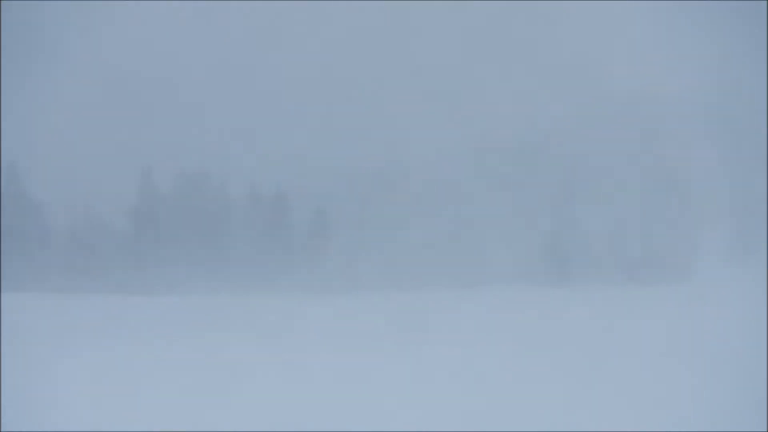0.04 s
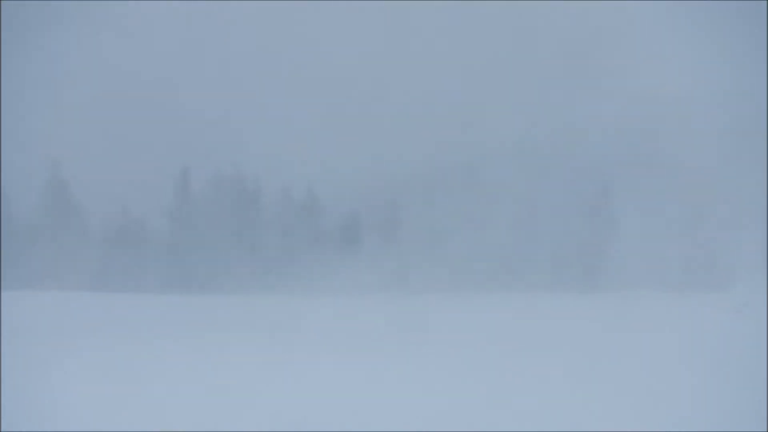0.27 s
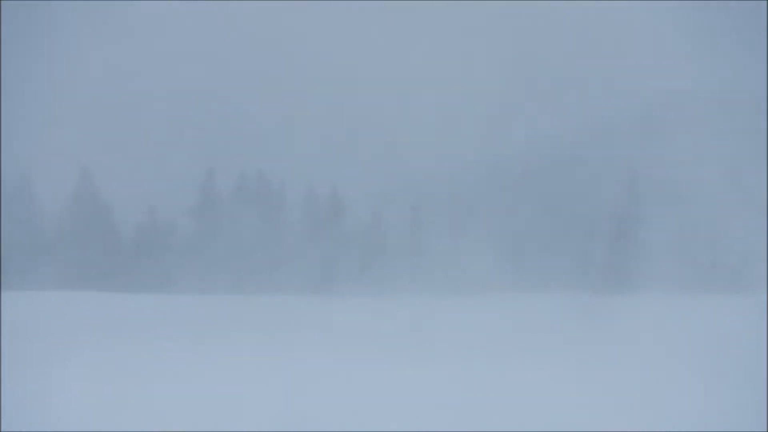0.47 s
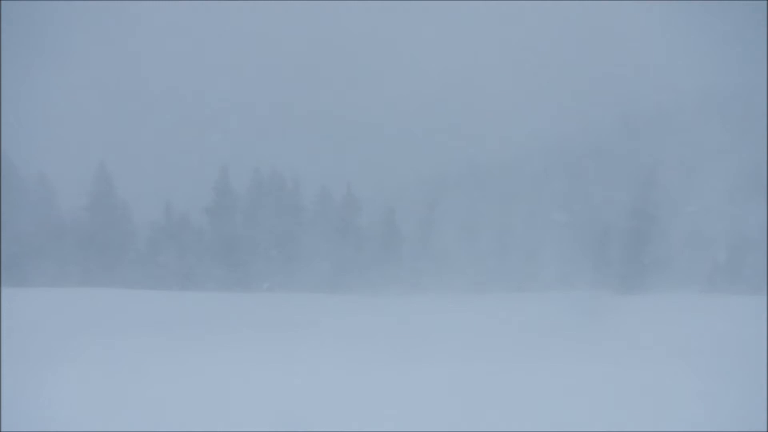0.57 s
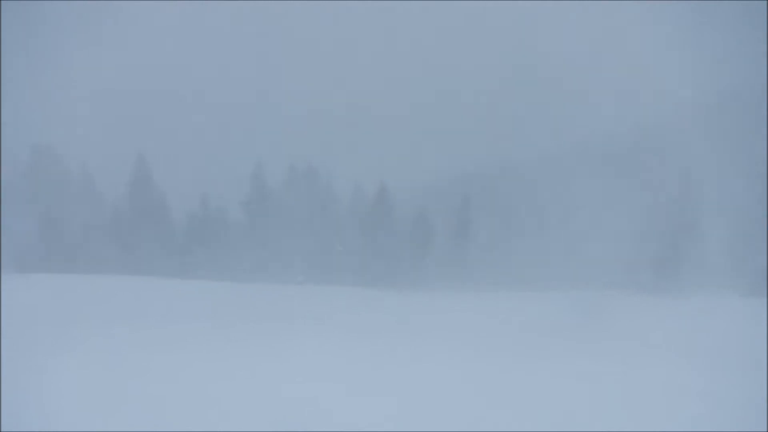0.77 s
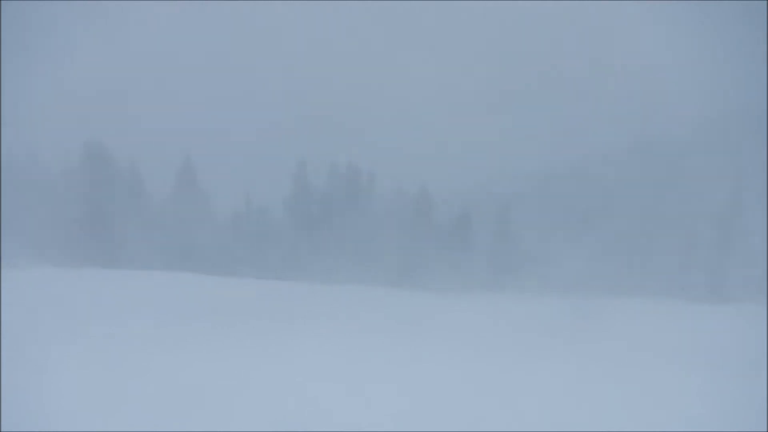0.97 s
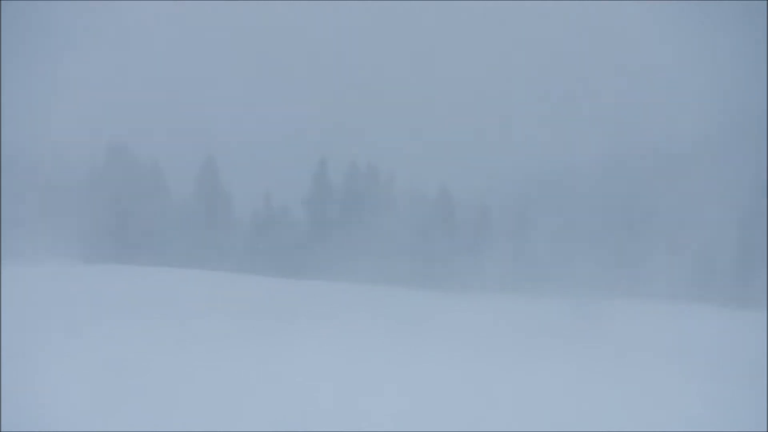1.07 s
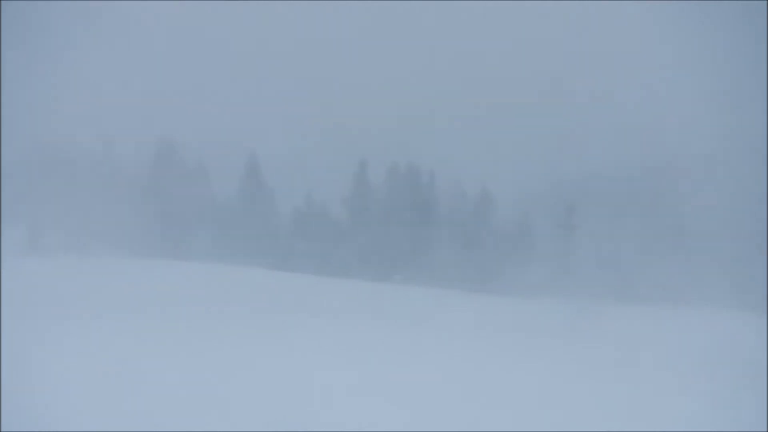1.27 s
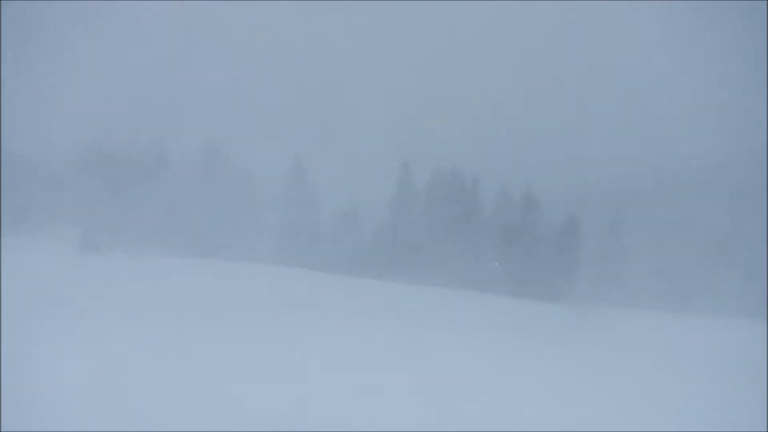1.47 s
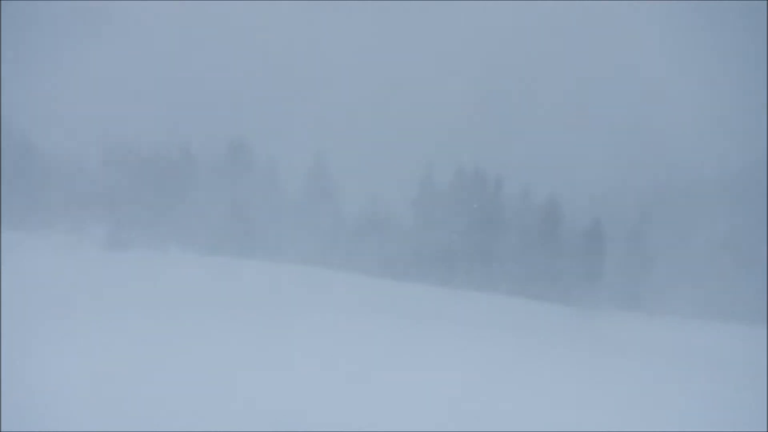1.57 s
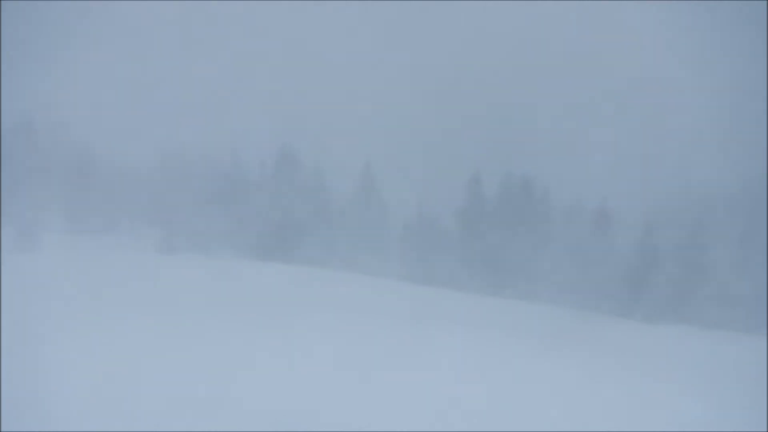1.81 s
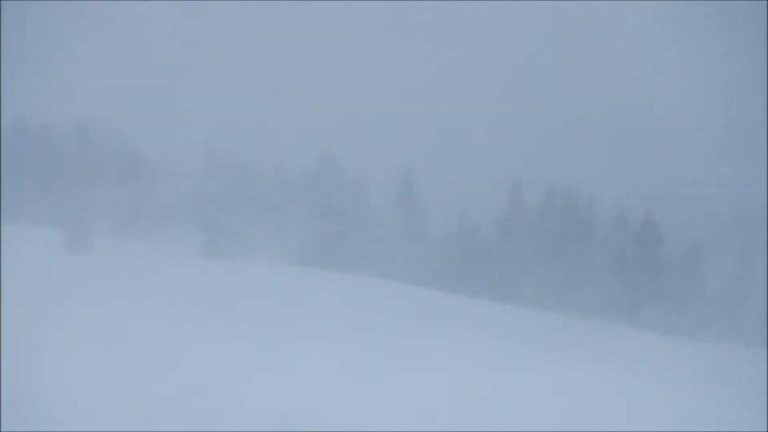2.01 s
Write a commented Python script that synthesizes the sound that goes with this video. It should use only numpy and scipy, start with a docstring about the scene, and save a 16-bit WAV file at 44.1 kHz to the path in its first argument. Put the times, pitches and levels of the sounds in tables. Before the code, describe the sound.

Heavy low wind rumble thumps the microphone in uneven lumps, ice grains ticking, then eases off

```python
"""Wind over an open snowfield, heard through the two ports (left and right) of a camera's microphone.
From the start a storm rushes in the firs (shaped noise), and a gust soon swells in (lumpy low noise).
Early in the gust, snow sifts (random clicks), brushes (noise swishes) and ticks (short rings) on the housing.
Next the gust slaps the ports hardest (single pressure swings), while the rush is heard more faintly for a bit.
The gust eases into small puffs, and at the end a little more snow fizzes, brushes and ticks."""
import sys
import numpy as np
from scipy.fft import rfft, irfft, next_fast_len
from scipy.io import wavfile
from scipy.ndimage import map_coordinates

SR = 44100
rng = np.random.default_rng(int(sys.argv[2]) if len(sys.argv) > 2 else 0)


def wav_out(sig):
    """Save sig, one row per channel (or a flat mono array), as 16-bit PCM at SR to the path in sys.argv[1]."""
    wavfile.write(sys.argv[1], SR, np.round(np.clip(np.atleast_2d(sig).T, -1, 1) * 32767).astype(np.int16))


N = 90404  # length in samples, about 2 s


def amp(db):
    """Turn decibels into a gain."""
    return 10 ** (np.asarray(db) / 20)


def unit(x):
    """Scale a sound to an average (rms) strength of 1."""
    return x / np.sqrt(np.mean(x ** 2) + 1e-20)


def along(points, hz):
    """Read a value at each frequency from (Hz, value) points, on a log frequency axis."""
    f, v = np.transpose(points)
    return np.interp(np.log(hz + 1), np.log(f + 1), v)


def curve(rows):
    """Join (time, value) rows with straight lines, one value per sample."""
    return np.interp(np.arange(N) / SR, *np.transpose(rows))


def lean(db):
    """Left and right gains that differ by the given decibels; positive is louder on the left."""
    half = np.atleast_1d(db) / 2
    return amp(np.array([half, -half]))


def wobble(rate):
    """A smooth random curve through `rate` random points a second."""
    return map_coordinates(rng.standard_normal(1024), [np.arange(N) * rate / SR], mode="wrap")


def filtered(x, response):
    """Multiply the spectrum of x by a response that depends on frequency."""
    m = next_fast_len(N + SR // 2)  # spare room at the end for ringing
    hz = np.fft.rfftfreq(m, 1 / SR)
    return irfft(rfft(x, m) * response(hz), m)[..., :N]


def coloured(x, spectrum):
    """Shape x with a tone curve, then scale it to rms 1."""
    return unit(filtered(x, lambda hz: amp(along(spectrum, hz))))


# level at which the rush reaches the ear, with a brief dip around 0.5 to 0.7 s, before its overall lift:
# (time [s], level [dB])
RUSH_HEARD = [(0, -46.5), (.15, -49), (.22, -50.5), (.33, -48), (.41, -50), (.49, -54), (.55, -52),
              (.6, -52), (.68, -50.5), (.9, -45.5), (1.22, -45), (1.35, -43.5), (1.6, -44), (1.9, -44),
              (2.05, -43.5)]
# tone of the rush: (frequency [Hz], relative level per Hz [dB])
FIRS_TONE = [(40, -45), (150, 2), (400, 2), (800, 1), (1400, 1.5), (2000, -0.5), (2900, -4), (3600, -8.5),
             (5000, -11), (7500, -15.5), (9500, -15.5), (12000, -13), (14500, -20.5), (16000, -28)]
# how alike left and right are, 1 or more meaning identical: (frequency [Hz], likeness [0 to 1])
FIRS_LIKENESS = [(60, 3), (290, 1), (1400, 0.78), (3000, 0.88), (4500, 0.62), (7500, 0.33), (10000, 0.39),
                 (15000, 0.3)]
# which side is louder: (frequency [Hz], left minus right [dB])
FIRS_BALANCE = [(100, 3), (600, -2.5), (2300, 0.5), (4500, 3.5), (8000, 0), (15000, -2.5)]
RUSH_LIFT_DB, FIRS_LEAD_S = 4, .00006  # overall lift; how much earlier the left port hears it


def firs():
    """The far rush is noise, near mono in the middle and wide in the treble; it reaches the left port first."""
    def blend(hz):
        """Shares of common and opposite noise that give the wanted likeness."""
        turn = np.arccos(np.clip(along(FIRS_LIKENESS, hz), -1, 1)) / 2
        return np.array([np.cos(turn), np.sin(turn)])

    def ports(hz):
        """Side balance, plus a phase turn that makes the left port early and the right one late."""
        early_late = np.exp(np.outer([1, -1], 1j * np.pi * hz * FIRS_LEAD_S))
        return lean(along(FIRS_BALANCE, hz)) * early_late

    mid, side = filtered(rng.standard_normal((2, N)), blend)
    pair = filtered(np.array([mid + side, mid - side]), ports)
    level = curve(RUSH_HEARD) + RUSH_LIFT_DB + 0.7 * wobble(13.56)
    return amp(level) * coloured(pair, FIRS_TONE)


# how loud the blown snow sifts over the housing: (time [s], level [dB])
DRIFT_LEVEL = [(0, -65), (.1, -57), (.155, -45), (.215, -57), (.255, -40.5), (.32, -45), (.395, -54),
               (.42, -46), (.455, -42), (.49, -53), (.55, -45), (.6, -65), (.73, -46.5), (.8, -56.5),
               (1.8, -56), (1.95, -48), (1.99, -41.5), (2.05, -46)]
# tone of the sifting: (frequency [Hz], relative level per Hz [dB])
SIFT_TONE = [(500, -36), (2000, -5), (4000, -4.5), (7500, -4.5), (10000, -1), (12000, 4), (14500, -1.5),
             (16000, 1)]
GRAINS_PER_S, GRAIN_SPREAD_DB = 1100, 13  # grains a second at each port; most a grain is raised


def spindrift():
    """Dense tiny snow grains of uneven size, each a single click, make a bright fizz."""
    hits = rng.random((2, N)) < GRAINS_PER_S / SR
    sizes = amp(GRAIN_SPREAD_DB * rng.uniform(-0.54, 1, (2, N)))
    push_or_pull = rng.choice([-1, 1], (2, N))
    return amp(curve(DRIFT_LEVEL)) * coloured(hits * sizes * push_or_pull, SIFT_TONE)


# clumps of snow brushing the housing: (time [s], level [dB], half length [s])
SNOW_CLUMPS = [(0.258, -42.5, 0.0088), (0.444, -34.5, 0.0029), (1.991, -34, 0.0058)]
# tone of the brushing: (frequency [Hz], relative level per Hz [dB])
SCUFF_TONE = [(150, -11), (500, 3), (1000, 7), (2000, 0.5), (4000, -6), (8000, -15.5), (15000, -10)]


def scuffs():
    """Soft clumps of snow make short, duller swishes: noise that swells and fades in a bell shape."""
    t = np.arange(N) / SR
    level = sum(amp(db) * np.exp(-.5 * ((t - s) / half) ** 2) for s, db, half in SNOW_CLUMPS)
    return level * coloured(rng.standard_normal((2, N)), SCUFF_TONE)


# ice grains hitting the housing:
# (time [s], level [dB], left minus right [dB], dull knock relative to that level [dB])
ICE_HITS = [(0.204, -28.5, 5, -19), (.258, -25, -4, -18), (0.263, -19, -12, 3), (0.3428, -25, 3, -10),
            (.376, -27.5, 7, -6), (0.4174, -34, 12, 13.5), (0.4441, -13, -4, -3.5), (0.447, -18.5, 4, -20),
            (.460, -31.5, 22, 4.5), (.5628, -28.5, -6, -6), (.617, -27.5, -1, -16), (0.6233, -31, -5, 15),
            (1.8453, -19.5, -6.5, 1.5), (1.980, -29, 5, -12), (1.987, -33, 3, 9)]
# tones the housing rings with: (centre frequency [Hz], level within a tick [dB], time to fade by 60 dB [s])
HOUSING_TONES = [(6600, -20, 0.0041), (10900, -4.5, 0.0019), (12150, -3.5, 0.0017), (13900, -20, 0.0026)]
KNOCK_HZ, KNOCK_T60_S, KNOCK_RISE_S = 880, 0.0012, .00004  # pitch, time to fade by 60 dB, softened start


def ice_ticks():
    """Each larger grain rings the housing for a few milliseconds, over a dull knock."""
    out = np.zeros((2, N + SR))
    t = np.arange(SR // 50) / SR
    knock = amp(-60 * t / KNOCK_T60_S) * np.cos(2 * np.pi * KNOCK_HZ * t)
    knock = knock * -np.expm1(-t / KNOCK_RISE_S)
    for s, db, pan_db, knock_db in ICE_HITS:
        bright = np.zeros((2, len(t)))
        for port in range(2):
            for hz, level, t60 in HOUSING_TONES:
                pitch = hz * (1 + 0.022 * rng.standard_normal())  # a little different each time
                bright[port] += amp(level - 60 * t / t60) * np.sin(2 * np.pi * pitch * t)
        start = round(s * SR)
        out[:, start:start + len(t)] += amp(db) * lean(pan_db) * (bright + amp(knock_db) * knock)
    return out[:, :N]


# single eddies that slap a port, before tone shaping:
# (time [s], level [dB], pitch [Hz], port struck ["L" or "R"])
EDDY_SLAPS = [(0.151, -15, 100, "L"), (.232, -7, 194, "L"), (.341, -4, 254, "R"), (0.345, -6, 238, "L"),
              (.368, -6.5, 240, "R"), (.383, -14, 486, "R"), (0.406, -4, 278, "R"), (.410, -8.5, 400, "R"),
              (.417, -3, 500, "L"), (.522, -8.5, 164, "R"), (.527, -3.5, 423, "R"), (.539, -16, 477, "R"),
              (.555, -19, 604, "R"), (.5675, -12, 420, "L"), (0.612, -6.5, 166, "R"), (.667, 4, 193, "L"),
              (.679, -7, 313, "L"), (0.71, 2, 120, "R"), (0.716, 1.5, 160, "L"), (.726, 2.5, 350, "R"),
              (.731, -2, 510, "R"), (.745, -4.5, 400, "R"), (.785, -6, 65, "L"), (0.785, -0.5, 144, "R"),
              (0.8013, -11, 130, "R"), (.81, -2.5, 220, "R"), (.816, -3.5, 314, "R"),
              (0.835, -5.5, 343, "L"), (.84, -4.5, 263, "R"), (0.851, -8, 440, "L"), (0.864, -4.5, 90, "L"),
              (0.865, -6, 339, "R"), (.886, -9.5, 517, "L"), (.891, -8, 746, "R"), (0.896, -11, 170, "L"),
              (0.906, -1.5, 108, "R"), (.928, -7.5, 220, "L"), (0.978, -9, 315, "R"),
              (0.995, -17.5, 596, "R"), (1.023, -9, 80, "R"), (1.036, -6.5, 230, "R"),
              (1.044, -6, 480, "R"), (1.06, -13, 317, "R"), (1.134, -11, 128, "R"), (1.749, -12, 80, "R"),
              (1.7578, -13.5, 171, "R"), (1.765, -13, 242, "R"), (1.776, -14, 272, "L"),
              (1.831, -12.5, 71.6, "L")]
# lengths of the rise and the fade, in cycles of the pitch; level at the port not struck
SLAP_RISE_CYCLES, SLAP_FADE_CYCLES, FAR_PORT_DB = 0.22, 0.43, -20


def slaps():
    """An eddy strikes one port: about one swing of pressure, quick to rise and slower to fade."""
    out, t = np.zeros((2, N)), np.arange(N) / SR
    for s, db, hz, port in EDDY_SLAPS:
        cycles = (t - s) * hz
        width = np.where(cycles < 0, SLAP_RISE_CYCLES, SLAP_FADE_CYCLES)
        swell = np.exp(-.5 * (cycles / width) ** 2)
        ports = amp(FAR_PORT_DB * np.array([[port != "L"], [port != "R"]]))
        swing = np.sin(2 * np.pi * (cycles + rng.random((2, 1))))  # random phase at each port
        out += amp(db) * ports * swell * swing
    tone = [(20, -39), (90, 0.5), (900, -2), (2500, -7)]  # (frequency [Hz], gain [dB])
    return filtered(out, lambda hz: amp(along(tone, hz)))


def eddies(spectrum, rate, lumpy_db):
    """Turbulent air pressure that comes in lumps, unrelated at the two ports."""
    lumps = amp(lumpy_db * np.tanh([wobble(rate), wobble(rate)]))
    return coloured(lumps * rng.standard_normal((2, N)), spectrum)


# how strong the deep heave is: (time [s], level [dB])
HEAVE_LEVEL = [(0, -69), (.08, -32), (.19, -41), (.235, -18.5), (.3, -34.5), (.41, -24), (.49, -30),
               (.55, -26), (.64, -24.5), (.71, -20), (.755, -24), (.795, -12.5), (.86, -21), (.93, -14.5),
               (.98, -30), (1.03, -19), (1.1, -24.5), (1.3, -31.5), (1.43, -52), (1.54, -47), (1.59, -33.5),
               (1.71, -36.5), (1.75, -26), (1.79, -43), (1.83, -30.5), (1.88, -41), (2.02, -28)]
# wind pressure at the ports, before the rumble's lift: (time [s], level [dB])
GUST_LEVEL = [(0, -50.5), (.05, -45.5), (.075, -32), (.11, -35.5), (.15, -24.5), (.18, -52.5), (.21, -37),
              (.24, -30.5), (.31, -26), (.34, -24.5), (.41, -19), (.48, -34), (.525, -26), (.565, -22.5),
              (.59, -31), (.62, -18.5), (.665, -20.5), (.69, -23.5), (.72, -18.5), (.77, -13.5), (.82, -25),
              (.9, -18), (.96, -24.5), (1.04, -26), (1.08, -34.5), (1.14, -32.5), (1.3, -32.5), (1.34, -48),
              (1.52, -52.5), (1.6, -39.5), (1.72, -49), (1.765, -34), (1.8, -32), (1.88, -43.5),
              (2.05, -40)]
# low-mid flutter as the flow tears off the housing, before its lift: (time [s], level [dB])
FLUTTER_LEVEL = [(0, -58), (.22, -57), (.32, -49), (.35, -37), (.39, -41), (.412, -22), (.45, -55),
                 (.5, -70), (.53, -29.5), (.565, -30.5), (.595, -54), (.67, -25), (.69, -32.5), (.727, -20),
                 (.75, -22), (.77, -36), (.84, -25), (.89, -22.5), (.915, -38), (.96, -43), (.99, -32),
                 (1.015, -56), (1.045, -29), (1.08, -71), (1.5, -63), (1.73, -73), (1.77, -35), (1.8, -68)]
# which port faces the wind: (time [s], left minus right [dB])
WIND_SIDE = [(0, -6), (.15, -6.5), (.23, -8), (.32, -3.5), (.55, -2.5), (.67, -0.5), (.8, 2.5), (1.05, -9),
             (1.27, -6.5), (1.5, -5), (1.82, 5), (2.05, -6)]
# tones of the heave, the rumble and the flutter: (frequency [Hz], relative level per Hz [dB])
HEAVE_TONE = [(10, -32), (27, -12.5), (49, 2), (62, -6.5), (88, -1.5), (130, -13.5), (250, -42), (600, -86)]
RUMBLE_TONE = [(20, -27), (60, -11), (110, -1), (150, -0.5), (220, -3), (330, -11), (480, -18), (900, -36),
               (2500, -90)]
FLUTTER_TONE = [(80, -14), (200, 2.5), (370, 1), (550, 0), (800, -8.5), (1150, -17.5), (1700, -32),
                (4000, -47), (10000, -67)]
RUMBLE_LIFT_DB, FLUTTER_LIFT_DB = 0.5, 4.5


def buffeting():
    """Huge eddies heave, smaller ones rumble, and in the hardest pushes fast ones flutter on top."""
    heave = amp(curve(HEAVE_LEVEL)) * eddies(HEAVE_TONE, rate=26, lumpy_db=1.5)
    rumble = amp(curve(GUST_LEVEL) + RUMBLE_LIFT_DB) * eddies(RUMBLE_TONE, rate=60, lumpy_db=5.0)
    flutter = amp(curve(FLUTTER_LEVEL) + FLUTTER_LIFT_DB) * eddies(FLUTTER_TONE, rate=110, lumpy_db=9.0)
    return heave + (rumble + flutter) * lean(curve(WIND_SIDE))


def scene():
    """The storm beyond, snow on the housing, wind on the ports."""
    return firs() + spindrift() + scuffs() + ice_ticks() + slaps() + buffeting()


def record(dry):
    """The camera rounds off the highest peaks and keeps nothing above its band limit."""
    rounded = dry / (1 + np.abs(dry) ** 6) ** (1 / 6)
    return filtered(rounded, lambda hz: hz < 15900)  # band limit in Hz


dry = scene()
out = record(dry)
wav_out(out)
```